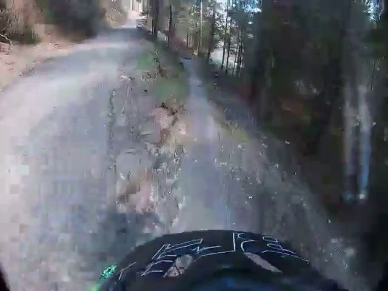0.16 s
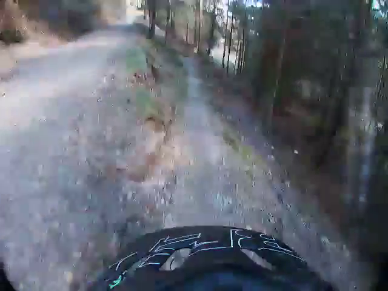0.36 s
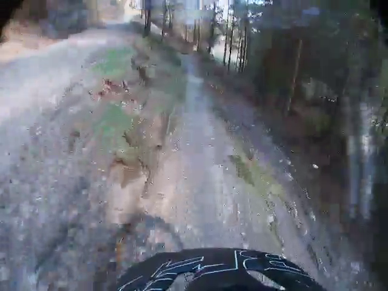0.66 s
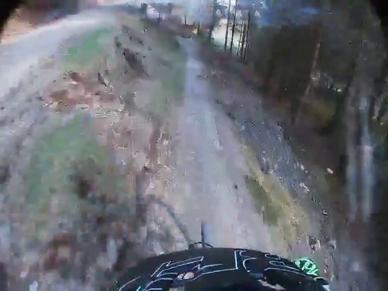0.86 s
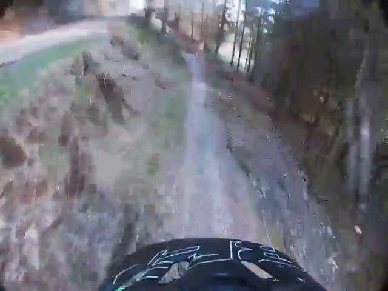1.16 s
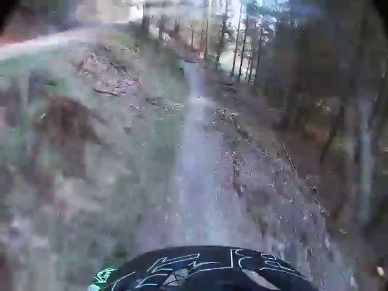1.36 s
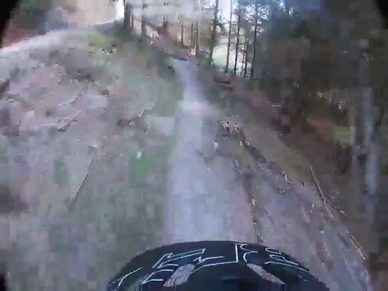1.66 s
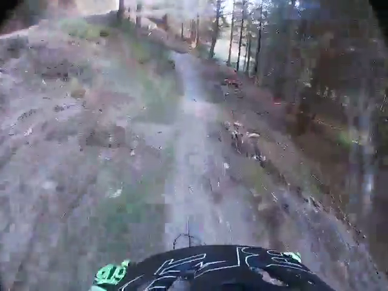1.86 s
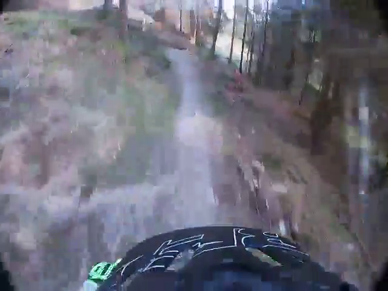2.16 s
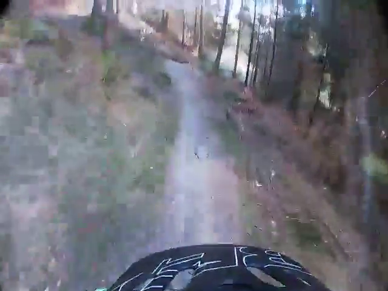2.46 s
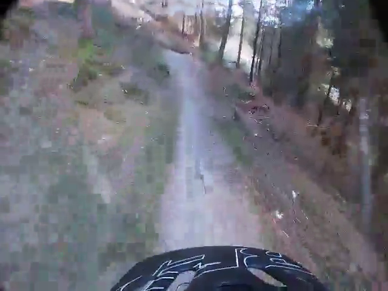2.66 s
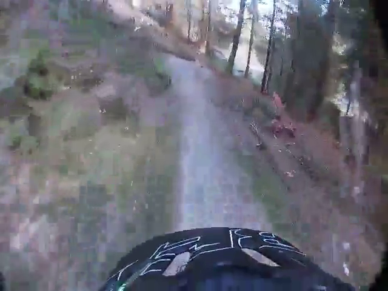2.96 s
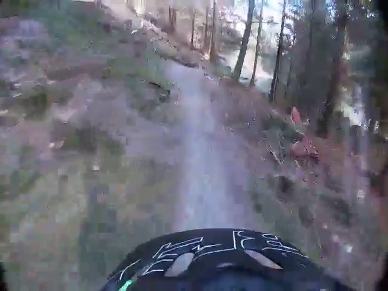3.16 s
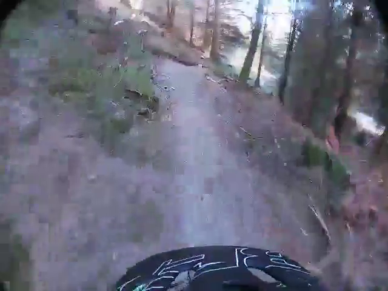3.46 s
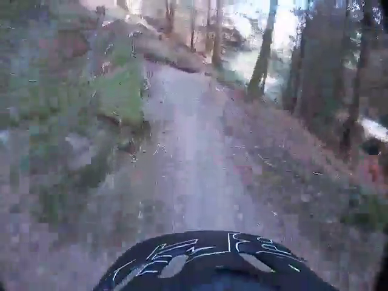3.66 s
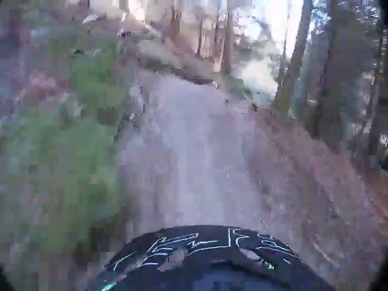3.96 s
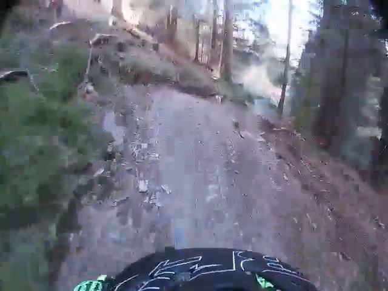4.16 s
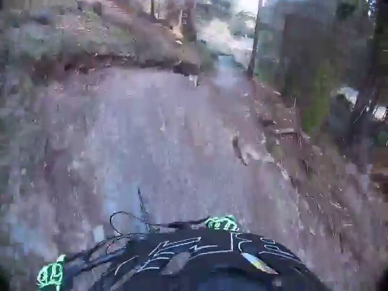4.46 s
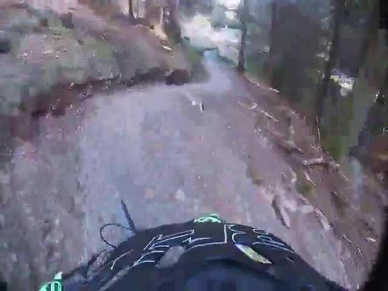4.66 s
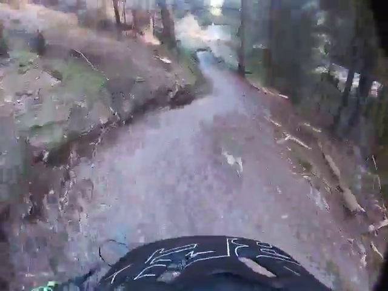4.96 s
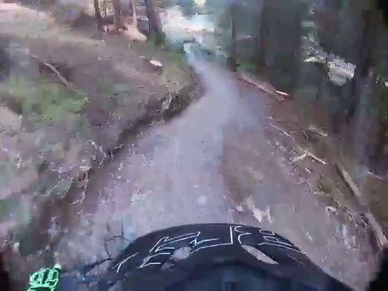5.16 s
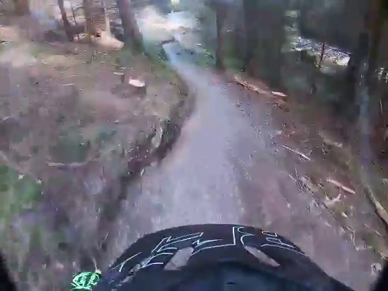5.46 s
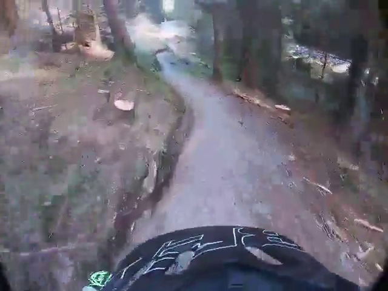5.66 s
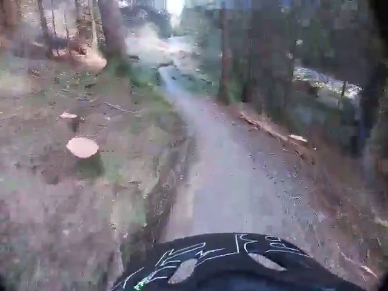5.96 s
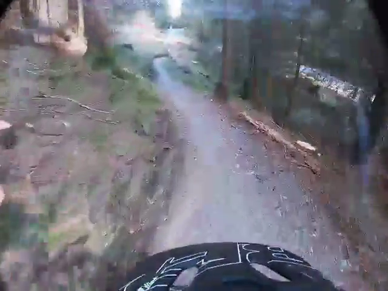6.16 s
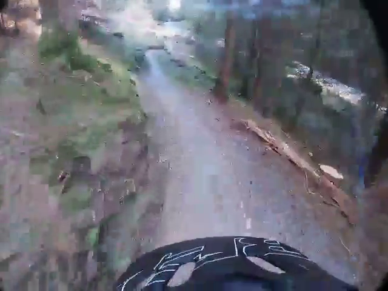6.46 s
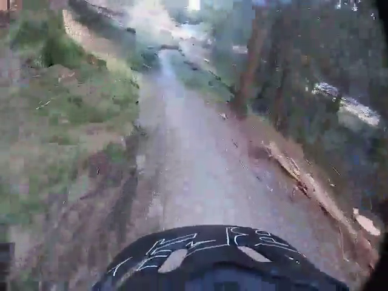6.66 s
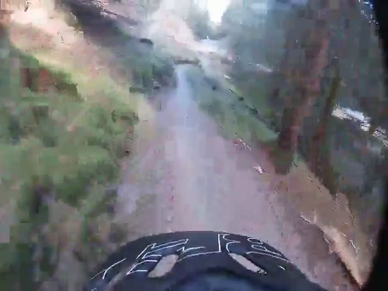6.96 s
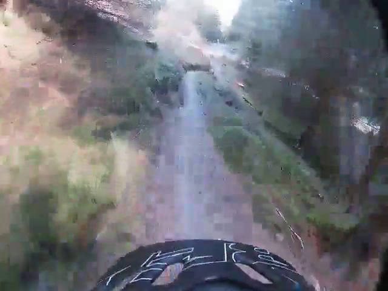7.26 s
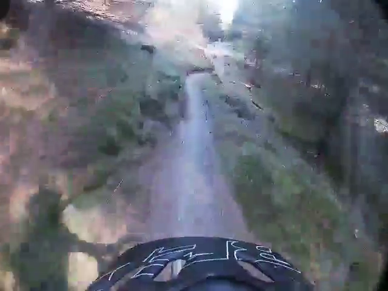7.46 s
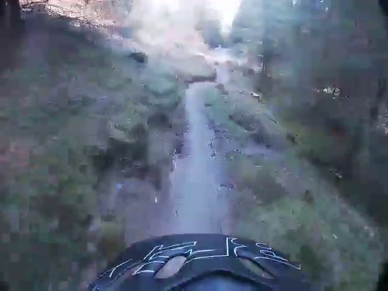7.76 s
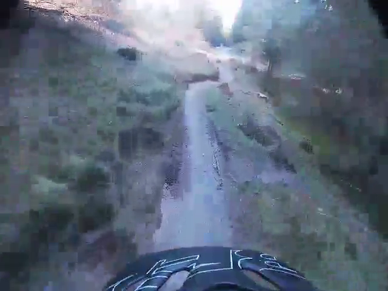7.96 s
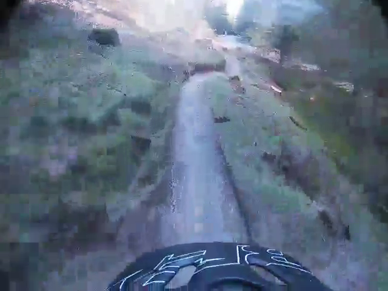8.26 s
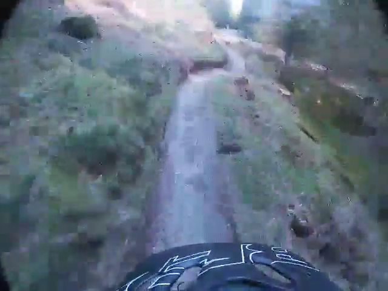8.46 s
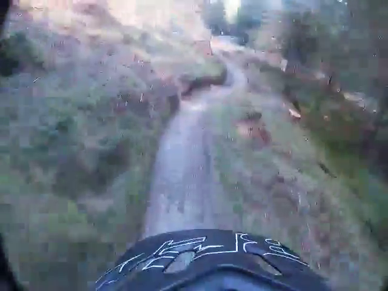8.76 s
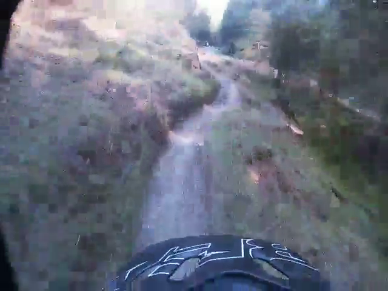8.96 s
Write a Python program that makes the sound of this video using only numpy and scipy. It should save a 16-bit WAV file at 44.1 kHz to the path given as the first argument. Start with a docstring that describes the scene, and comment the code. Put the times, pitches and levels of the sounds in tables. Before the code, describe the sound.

A mountain bike speeds down a gravel forest path, heard from a closed camera case on the rider's helmet. Gritty crunch and fine hiss run throughout, in uneven clumps. Hard, close plastic knocks and small rattles break over it, while bumps give deep, soft booms and frame thuds. Low wind buffeting fills the bottom. Knocks crowd together from the middle onward, and a few bright stone sprays come late.

```python
"""A mountain bike's tyres crunch fast down a gravel forest trail, as random stone contacts ringing a camera case.
The microphone sits in that closed case on the rider's helmet, above the wheels and close to every knock.
Its mount knocks and rattles as paired impulses into the case; bumps rock the helmet and set its low modes booming.
Around this, low noise makes the wind, the helmet's hum and the frame's rumble.
Sprays of small stones and the finest hiss reach the microphone without the ring of the case."""
import sys
import numpy as np
from scipy import signal
from scipy.fft import rfft, irfft, next_fast_len
from scipy.io import wavfile
from scipy.ndimage import uniform_filter1d, map_coordinates

SR = 44100
rng = np.random.default_rng(int(sys.argv[2]) if len(sys.argv) > 2 else 0)


def put_to_file(sound):
    """Save the sound as 16-bit audio at rate SR, in the file named by the first command-line argument."""
    columns = np.atleast_2d(sound).T  # one column per channel
    safe = np.clip(columns, -1, 1)
    whole_steps = np.round(safe * 32767)
    wavfile.write(sys.argv[1], SR, whole_steps.astype(np.int16))


N = 400869


def amp(db):
    """Decibels to a linear factor."""
    return 10 ** (np.asarray(db) / 20)


def unit(x):
    """x at rms 1."""
    return x / np.sqrt(np.mean(x ** 2) + 1e-20)


def along(points, hz):
    """The curve through (f/Hz, value) points on a log frequency axis."""
    f, v = np.transpose(points)
    return np.interp(np.log(hz + 1), np.log(f + 1), v)


def curve(rows):
    """One value per sample from (t/s, value) rows."""
    times, values = np.transpose(rows)
    return np.interp(np.arange(N) / SR, times, values)


def wobble(rate, step_size=64):
    """A smooth random curve with `rate` knots a second."""
    at = np.arange(0, N + step_size, step_size)
    knots = rng.standard_normal(int(N * rate / SR) + 4)
    return np.interp(np.arange(N), at, map_coordinates(knots, [at * rate / SR]))


def add(track, s, sound):
    """Mix a sound into a track from time s on."""
    start = int(np.clip(round(s * SR), 0, N - 1))
    track[start:start + len(sound)] += sound[:N - start]


def filtered(x, gain):
    """x times a gain that depends on frequency."""
    m = next_fast_len(N + SR // 2)
    return irfft(rfft(x, m) * gain(np.fft.rfftfreq(m, 1 / SR)), m)[:N]


def noise(spectrum):
    """Noise of rms 1 with the given colour."""
    return unit(filtered(rng.standard_normal(N), lambda hz: amp(along(spectrum, hz))))


def grains(rate, spread_db):
    """Random stone contacts of rms 1, `rate` a second; a positive spread makes many small and a few large."""
    place, size, side = rng.random((int(rate * N / SR), 3)).T
    push = np.sign(side - .5) * amp(spread_db * np.minimum(-np.log(size + 1e-9), 4))
    return unit(np.bincount((place * N).astype(int), push, N))


def patchy(x, depth_db, size=512):
    """x at rms 1, its colour shifting at random in patches a few hundred Hz wide and some 30 ms long."""
    z = signal.stft(x, nperseg=size)[2]
    field = uniform_filter1d(rng.standard_normal(z.shape), size=7, axis=0)  # smooth over frequency
    field = uniform_filter1d(field, size=5, axis=1)  # smooth over time
    return unit(signal.istft(z * amp(depth_db * unit(field)), nperseg=size)[1][:N])


# resonances of the camera case around the microphone: f/Hz, width/Hz, level/dB
CASE_MODES = [(983.6, 174, -13), (1223, 283, -11), (1791, 320, -1), (2010, 510, -8.5), (2575, 160, -10.5),
              (2840, 156, -11), (3164, 220, -15), (3250, 350, -16), (4172, 415, -16.5), (4960, 160, -29.5),
              (4850, 190, -23.5), (5710, 380, -28.5), (5444, 250, -27.5), (6500, 284, -49),
              (6904, 580, -28.5), (6800, 820, -33), (7530, 520, -45.5)]


def case_ring(colour, size=1024):
    """The causal ring of the case, peak 1: its resonances, struck by a blow of the given colour."""
    hz = np.fft.rfftfreq(size, 1 / SR) + 1
    power = sum(amp(db) ** 2 / (1 + ((hz * hz - c * c) / (hz * w)) ** 2) ** 2 for c, w, db in CASE_MODES)
    # the shell shuts out the top octave
    wall_db = along([(7600, 1.5), (8400, -7.5), (10500, -14.5), (13000, -16.5)], hz)
    spectrum = np.sqrt(power) * amp(wall_db + along(colour, hz))
    # folding the cepstrum gives the minimum-phase ring
    cepstrum = irfft(np.log(spectrum + 1e-6))
    cepstrum[1:size // 2] *= 2
    cepstrum[size // 2 + 1:] = 0
    ring = irfft(np.exp(rfft(cepstrum)))
    return ring / np.abs(ring).max()


# roughness of the trail, as it shakes the helmet: t/s, relative level/dB
TRAIL_ROUGHNESS = [(0.0, -47.5), (0.15, -72.5), (0.48, -17), (0.66, -65), (0.86, -24.5), (1.11, -55.5),
                   (1.58, -52), (1.68, -22), (2.74, -40.5), (2.92, -23.5), (3.39, -34), (4.25, -18),
                   (4.53, -42), (5.25, -22), (5.39, -71), (6.19, -37), (7.3, -46.5), (7.81, -48),
                   (7.93, -34.5), (8.31, -56), (8.41, -28), (9.09, -26.5)]


def roughness_db():
    """Roughness of the ground along the ride, joined by straight lines in dB."""
    return curve(TRAIL_ROUGHNESS)


# how hard the tyres work the gravel, dipping where the bike goes light: t/s, load level/dB
TYRE_LOAD = [(0.0, -55.5), (0.21, -44), (0.33, -48.5), (0.42, -36.5), (0.69, -47.5), (0.78, -45.5),
             (1.21, -42), (1.31, -49.5), (1.73, -39.5), (2.03, -46.5), (2.53, -39), (2.63, -46.5),
             (3.01, -38.0), (3.13, -45), (3.25, -40), (3.61, -44.0), (3.7, -36.5), (3.84, -40),
             (4.41, -40.5), (4.65, -51.5), (5.13, -37), (5.45, -57), (5.58, -42), (6.21, -43.5),
             (6.62, -37.5), (6.77, -42), (8.51, -36.5), (9.09, -40.5)]


def tyre_load_db():
    """Load of the tyres along the ride, joined by straight lines in dB."""
    return curve(TYRE_LOAD)


# rolling noise of the tyres over its share of the load: t/s, relative level/dB
ROLLING_LEVEL = [(0, 0.5), (1.2, -1), (1.9, 3), (2.8, 1), (4.1, 2), (4.6, 1), (6.2, -4.5), (7.6, 2.5),
                 (8.3, -2.5), (9.09, -2.5)]


def rolling_db():
    """Extra rolling noise along the ride, joined by straight lines in dB."""
    return curve(ROLLING_LEVEL)


# colour of the wind at the case: f/Hz, relative level/dB per Hz
BUFFET_COLOUR = [(5, -24), (11, 8.5), (22, -0.5), (33, -7), (50, -19.5), (80, -28.5), (130, -51.5),
                 (300, -83), (800, -120)]


def wind(buffet_db=-23, follows=0.11):
    """Slow eddies press on the case, more so where the ride is rough."""
    level_db = buffet_db + follows * roughness_db() + 5.1 * wobble(8)
    return amp(level_db) * noise(BUFFET_COLOUR)


# bumps in the trail: t/s, relative boom level of the helmet/dB, relative jolt level of the frame/dB
TRAIL_BUMPS = [(0.441, -15, -14.5), (0.837, -15.5, -14.5), (1.344, -32.5, -22), (1.604, -28.5, -24),
               (1.666, -23.5, -37), (1.753, -11.5, -4.5), (1.957, -21.5, -22), (2.34, -15, -21),
               (2.561, -27, -18.5), (2.921, -16.5, -16), (3.322, -20.5, -36), (3.693, -14, -21.5),
               (3.805, -13, -12), (4.045, -18, -14.5), (4.156, -13, -11.5), (4.26, -14.5, -11.5),
               (4.336, -16, -23), (4.691, -23.5, -23.5), (5.078, -18, -21.5), (5.188, -13, -10.5),
               (5.611, -30.5, -13), (6.039, -18.5, -16), (6.566, -18, -19), (7.89, -23.5, -11),
               (8.431, -19.5, -16.5), (8.542, -18, -15.5), (8.61, -25.5, -32), (8.773, -26.5, -33),
               (8.95, -23, -27), (9.006, -22, -23)]


def jolts(rise_s=0.017, fall_s=0.016):
    """How hard the bumps press the bike into the ground: an exponential rise and release about each bump."""
    out, t = np.zeros(N), np.arange(-SR // 10, SR // 5) / SR
    for s, _, db in TRAIL_BUMPS:
        add(out, s + t[0], amp(db) * np.exp(-np.maximum(-t / rise_s, t / fall_s)))
    return out


# colours of the humming helmet, the rolling frame and the thudding frame: f/Hz, relative level/dB per Hz
HUM_COLOUR = [(30, -20), (52, 2), (72, 1), (88, -9), (110, -18.5), (140, -35), (200, -49), (500, -100)]
ROLLING_COLOUR = [(70, -15), (135, 2.5), (165, 1), (215, -5.5), (285, -1), (390, -7.5), (470, -15),
                  (680, -12.5), (1000, -22.5), (2000, -68.5)]
THUD_COLOUR = [(70, -21.5), (130, 7.5), (175, 1.5), (225, -5.5), (285, 3.5), (390, -4.5), (470, -13.5),
               (680, -13), (1000, -24.5), (2000, -72.5)]


def shaking(jolt, load_db, hum_db=-5, rumble_db=-21.5, thud_db=-26.0):
    """The rough trail keeps the helmet humming and the loaded frame rumbling, with a thud at each bump."""
    hum = amp(roughness_db() + hum_db + 2.9 * wobble(10)) * noise(HUM_COLOUR)
    rolling = amp(load_db + rolling_db() + rumble_db + 4.1 * wobble(23)) * noise(ROLLING_COLOUR)
    thuds = amp(thud_db) * jolt * noise(THUD_COLOUR)
    return hum + rolling + thuds


# what the helmet rings with after a bump: mean f/Hz, mean relative level/dB, t60/s
HELMET_MODES = [(48.3, -16, 0.047), (73.8, 1.5, 0.25), (107.3, -20, 0.41), (159, -36, 0.065),
                (289.7, -28.5, 0.096), (383, -37, 0.11)]


def bumps(boom_db=3, rock_db=-8, rock_follows=0.32, rock_hz=15, rock_t60=0.3, rise_s=0.0086, rock_rise_s=0.012):
    """A bump shoves the head into a slow rocking and sets the helmet's low modes ringing."""
    lead_s = .05
    out, t = np.zeros(N), np.arange(SR // 3) / SR - lead_s
    boom_swell = (1 + np.tanh(t / rise_s)) / 2
    # soft swell, then free decay
    rocking = amp(-60 * t / rock_t60) / (1 + np.exp(-2 * t / rock_rise_s - 1))
    rocking = rocking * np.cos(2 * np.pi * rock_hz * t)
    for s, db, _ in TRAIL_BUMPS:
        boom = np.zeros(len(t))
        # each bump excites the modes a little differently in level and pitch
        chance = rng.standard_normal((len(HELMET_MODES), 2))
        for (hz, level, t60), (a, b) in zip(HELMET_MODES, chance):
            boom += amp(level + a - 60 * t / t60) * np.cos(2 * np.pi * hz * (1 + 0.046 * b) * t)
        boom = amp(db + boom_db) * boom * boom_swell
        rock = amp(rock_db + rock_follows * db) * rocking
        add(out, s - lead_s, -boom - rock)
    return out


# light rattles: ticks a second, level over the tyre load and its scatter (dB), mean treble (dB)
RATTLES_PER_S = 4
RATTLE_DB, RATTLE_SPREAD_DB, RATTLE_TREBLE_DB = 15, 1, -5.5


def rattles():
    """Light random ticks of the loose mount, stronger under load: rows like those of the knocks."""
    load_db = tyre_load_db()
    count = int(RATTLES_PER_S * N / SR)
    # one tick at random within each equal slot of time
    times = (np.arange(count) + rng.random(count)) * N / SR / count
    rows = []
    for s, (a, b) in zip(times, rng.standard_normal((count, 2))):
        level_db = load_db[int(s * SR)] + RATTLE_DB + RATTLE_SPREAD_DB * a
        rows.append((s, level_db, RATTLE_TREBLE_DB + 6 * b))
    return rows


# clear knocks of the mount, close to the microphone: t/s, relative level/dB, treble level/dB
MOUNT_KNOCKS = [(0.1144, -16, -14.5), (0.1879, -21, -1), (0.387, -22.5, -12), (0.422, -7, -4),
                (0.8196, -7, -3), (0.8652, -22.5, 2), (1.073, -28, -16), (1.4845, -22, -19),
                (1.5547, -8, -4), (1.6526, -11, -13), (1.6924, -6, -1.5), (1.7453, -17, -9),
                (1.8439, -21, -25), (1.937, -21.5, -16), (2.2167, -20, -1.5), (2.287, -8.5, -1.5),
                (2.7635, -8.5, -7), (3.2702, -7.5, -3), (3.3558, -9.5, -3), (3.6556, -6, -0.5),
                (3.717, -11.5, 0), (3.866, -23.5, -7), (3.9592, -9, -1.5), (4.3199, -10.5, -4),
                (4.4986, -23, -3), (4.6927, -7, -4), (4.764, -10, -3.5), (4.9815, -15.5, -10.5),
                (5.097, -22.5, 5), (5.172, -19.5, -17), (5.2816, -14, -10.5), (5.3726, -30.5, -17),
                (5.5606, -15, -1), (5.5947, -10.5, -4.5), (5.6152, -12.5, -13), (5.7068, -12.5, -4.5),
                (5.7864, -13, -11.5), (5.832, -21, -7), (5.8719, -17, -4.5), (6.0233, -15.5, -17),
                (6.2767, -19.5, -2), (6.3101, -21, -12), (6.415, -6, -3), (6.4724, -13, -1),
                (6.6226, -18, -5), (6.6354, -12.5, 0.5), (6.728, -8, -1), (6.8076, -22.5, 5),
                (6.8321, -21.5, 4), (7.1533, -22, -7), (7.224, -18, -8), (7.3678, -22, 1.5),
                (7.4161, -21.5, -17), (7.6039, -17.5, 4.5), (7.8176, -17.5, -13), (7.883, -5.5, 2),
                (8.166, -20.5, -24), (8.252, -17, 5.5), (8.3857, -18, -9), (8.502, -9, -7.5),
                (8.563, -14.5, -20), (8.6738, -17, -18), (8.8035, -7, -1), (8.9102, -7.5, -3.5),
                (9.0316, -20, -17)]


def knocks(level_db=-0.5, buzz_db=-32, buzz_t60=0.021, halo_db=-38, halo_t60=0.047, vary_db=3,
           rebound_db=-9, rebound_s=0.001096):
    """Each knock is a hard impulse into the case and a weaker one about a millisecond later, then a buzz."""
    lead = 132  # samples of noise before the impulse
    out, t = np.zeros(N), np.arange(-lead, SR // 20) / SR
    for s, db, treble_db in [*MOUNT_KNOCKS, *rattles()]:
        buzz = amp(db + buzz_db - 60 * np.abs(t) / buzz_t60) * np.clip(t / 0.00067, 0, 1)
        # a short noise surrounds each knock and blurs the light ones
        halo = amp(halo_db + 0.51 * db - 60 * np.abs(t) / halo_t60) * np.minimum(1 + t * SR / lead, 1)
        blow = (buzz + halo) * rng.standard_normal(len(t))
        blow[lead] = -amp(db + level_db)
        # the joint rebounds once, after 0.5 to 1.5 times rebound_s
        rebound = int(rebound_s * SR * (0.5 + rng.random()))
        blow[lead + rebound] -= amp(db + level_db + rebound_db)
        # hard knocks seat alike, light ones land anywhere
        low, high = vary_db * min(-db / 20, 1) * rng.standard_normal(2)
        ring = case_ring([(200, 27.0), (600, 5.9), (1000, 1 + low), (1800, 0.42),
                          (3000, .5 * treble_db + high - 0.5), (4500, treble_db), (8000, 0.4 * treble_db)])
        add(out, s - lead / SR, signal.fftconvolve(blow, ring))
    return out


# sprays of small stones: t/s, relative level/dB, time from the peak down to 1/e /s
STONE_SPRAYS = [(6.607, -48, 0.0057), (6.649, -54, 0.0093), (7.726, -53, 0.012), (8.305, -46.5, 0.0092),
                (8.409, -46.5, 0.013), (8.543, -41.5, 0.0092), (8.59, -68, 0.012)]
# colour of the spraying stones: f/Hz, relative level/dB per Hz
SPRAY_COLOUR = [(1000, -24), (2000, -11), (4500, -11), (7300, -5.5), (8500, -21), (10300, -28.5),
                (12000, -33)]


def sprays(level_db=-7):
    """Small stones thrown up by the tyres patter brightly on the bike, in brief bell-shaped swells."""
    swell, t = np.zeros(N), np.arange(-SR // 10, SR // 10) / SR
    for s, db, length in STONE_SPRAYS:
        add(swell, s + t[0], amp(db + level_db) * np.exp(-(t / length) ** 2))
    contacts = grains(rate=7100, spread_db=3.5)
    return swell * unit(filtered(contacts, lambda hz: amp(along(SPRAY_COLOUR, hz))))


# colours of the tyres' crunch, grit, airy hiss and dull bite: f/Hz, relative level/dB
CRUNCH_COLOUR = [(150, -7.5), (600, 0.5), (1000, 5), (1450, 3.5), (1750, 2), (1950, -1.5), (2600, 0),
                 (2850, 0.5), (3300, -1), (4200, -11.5), (8000, -13), (11000, -24.5)]
GRIT_COLOUR = [(1500, -23.5), (3000, -8.5), (4200, -0.5), (6000, 2), (7000, -6), (8000, 4), (10500, -1),
               (12000, -21.5)]
AIRY_COLOUR = [(800, -2.5), (1500, 3), (3000, 15.5), (4000, 2.5), (5200, -0.5), (6500, -2.5), (7800, -3.5),
               (8600, -16), (10700, -14.5), (11600, -42), (13000, -41.5)]
BITE_COLOUR = [(200, 28.5), (600, 10.5), (1000, 13.5), (1800, -6.5), (2600, -10), (4200, -2), (8000, -19)]
# gravel comes in clumps: depth (dB) on the smoothest and on the roughest trail
CLUMP_SMOOTH_DB, CLUMP_ROUGH_DB = 2.0, 2.8


def tyres(jolt, load_db, grit_follows=0.85, grit_base_db=-30.0, crunch_db=-2.5, rush_db=-14.5, rush_rolls=2.0,
          hiss_db=-1.0, airy_db=4, airy_rolls=0.28, pebble_db=-13, bite_db=-26, own_db=3.0):
    """Knobs crush gravel in clumps: stones crunch, pebbles tick and grit hisses, mostly through the case."""
    rough_db, roll_db = roughness_db(), rolling_db()
    grit_db = grit_base_db + grit_follows * load_db  # grit grows more slowly than the crunch
    rough_range = [rough_db.min(), rough_db.max()]
    clumps = np.interp(rough_db, rough_range, [CLUMP_SMOOTH_DB, CLUMP_ROUGH_DB]) * wobble(50)

    def through_case(contacts, colour):
        """Contacts ringing the case, at rms 1."""
        return unit(signal.oaconvolve(contacts, case_ring(colour))[:N])

    # the colour of the crunch shifts at random in short patches
    stones = patchy(through_case(grains(rate=1800, spread_db=4.0), CRUNCH_COLOUR), depth_db=3.0)
    crunch = amp(load_db + crunch_db + clumps) * stones
    # packed dirt under the rolling tread
    dirt = through_case(rng.standard_normal(N), CRUNCH_COLOUR)
    rush = amp(load_db + rush_rolls * roll_db + rush_db) * dirt
    # a loaded tyre digs in with a duller crunch
    bite = amp(bite_db) * jolt * through_case(grains(rate=5400, spread_db=-1.0), BITE_COLOUR)
    pebble_colour = [(1000, -0.5), (1800, -1.0), (3000, 1.5), (7000, -10.5)]
    pebbles = amp(load_db + pebble_db) * through_case(grains(rate=72, spread_db=8.0), pebble_colour)
    sand = patchy(through_case(grains(rate=1800, spread_db=7.0), GRIT_COLOUR), depth_db=4.0)
    grit = amp(grit_db + hiss_db + clumps + own_db * wobble(30)) * sand
    # the finest hiss leaks straight to the microphone
    airy = amp(grit_db + airy_db + airy_rolls * roll_db + clumps / 2) * noise(AIRY_COLOUR)
    return crunch + rush + bite + pebbles + grit + airy


def scene():
    """The whole ride at the helmet, from the wind to the tyres, on one channel."""
    jolt, load_db = jolts(), tyre_load_db()
    background = wind() + shaking(jolt, load_db)
    helmet = bumps() + knocks()
    gravel = sprays() + tyres(jolt, load_db)
    return (background + helmet + gravel)[None]


TOP_HZ = 13500  # band limit of the camera


def record(dry):
    """The microphone ignores steady pressure, and the camera keeps nothing above its band limit."""
    return filtered(dry[0], lambda hz: hz / np.hypot(hz, 6) * (hz < TOP_HZ))[None]


dry = scene()
out = record(dry)
put_to_file(out)
```